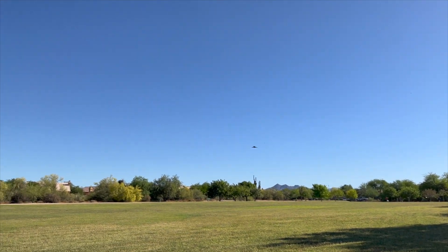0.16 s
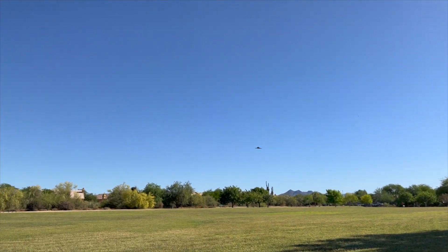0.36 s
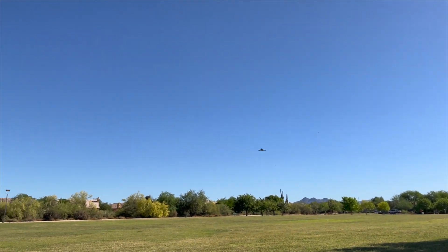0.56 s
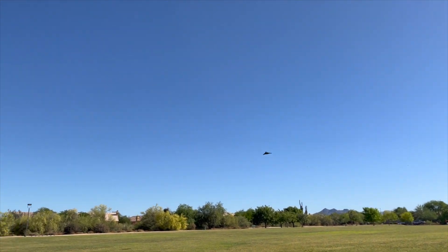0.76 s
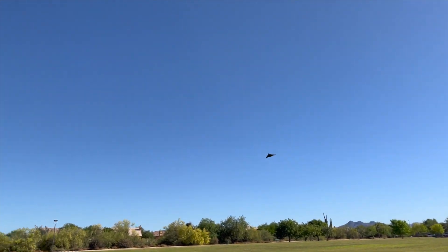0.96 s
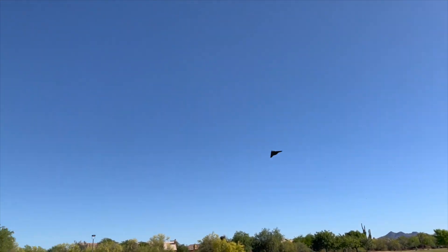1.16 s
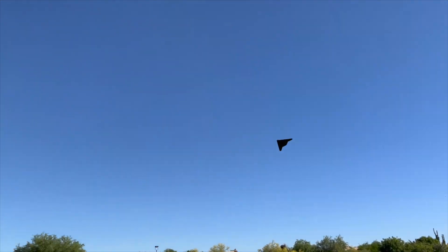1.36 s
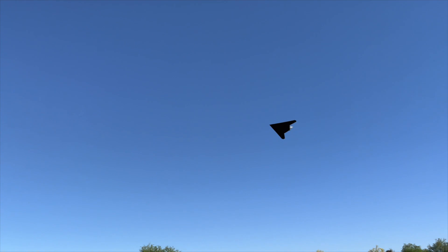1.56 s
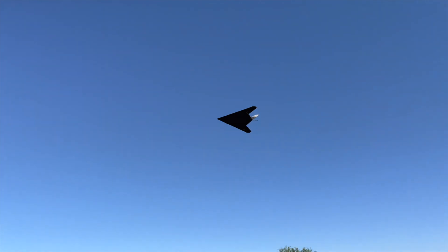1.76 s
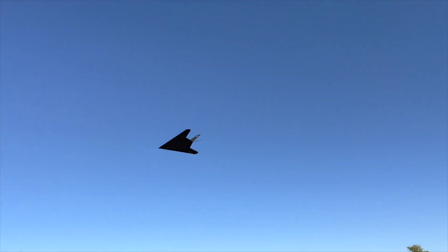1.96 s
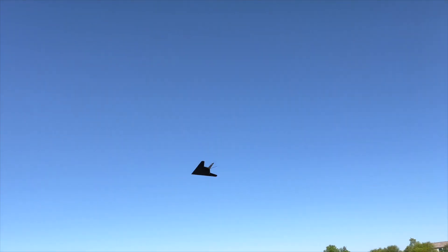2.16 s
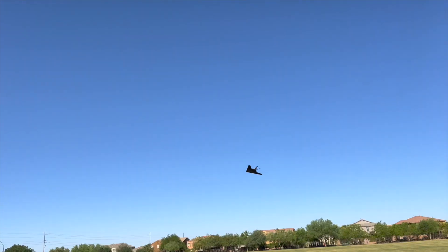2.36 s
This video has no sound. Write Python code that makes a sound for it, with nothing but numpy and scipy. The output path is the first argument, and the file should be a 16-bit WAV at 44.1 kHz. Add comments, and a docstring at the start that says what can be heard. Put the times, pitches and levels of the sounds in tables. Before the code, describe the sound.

Outdoors in a grassy field, heard on a stereo phone: a model jet's thin fan whine and rushing air grow fast, sweep close by, sag in pitch and ease off, over faint low traffic rumble.

```python
"""Over a grass field, a small model jet with an electric ducted fan comes in low, passes a phone and leaves.
Far traffic rumbles underneath: low noise. The efflux roars and hisses: noise in six bands, and the grass
mirrors it as a late, duller copy. Eleven blades sing as a roughened sine in a haze of turbulence, which is
noise moved up to the blade pitch. The shaft whines as sines with overtones; the pitch sags in passing."""
import sys
import numpy as np
from scipy import signal
from scipy.fft import rfft, irfft
from scipy.io import wavfile
from scipy.ndimage import uniform_filter1d, map_coordinates

SR = 44100
rng = np.random.default_rng(int(sys.argv[2]) if len(sys.argv) > 2 else 0)


def dump(signal):
    """Clip the signal to [-1, 1] and save it as 16-bit WAV at the path in sys.argv[1]."""
    limited = np.clip(np.atleast_2d(signal).T, -1, 1)
    pcm = np.round(limited * 32767).astype(np.int16)
    wavfile.write(sys.argv[1], SR, pcm)


N = 106192
T = np.arange(N) / SR  # time of each sample, s
HZ = np.maximum(np.fft.rfftfreq(N, 1 / SR), 1)  # frequency of each bin; at least 1 so its log exists
BLADES = 11

# Pitch of the turning shaft as heard: (time [s], frequency [Hz])
SHAFT_PITCH = [(0.06, 628.6), (0.4, 628.7), (0.8, 628.6), (1.1, 630.7), (1.3, 629.4), (1.45, 627.7),
               (1.55, 620.3), (1.65, 615.6), (1.75, 607.8), (1.85, 594.1), (1.95, 584.7), (2.05, 576.3),
               (2.12, 568.2), (2.2, 562.5), (2.28, 561.8), (2.35, 561), (2.41, 559)]
# The blades' sound, the haze before its trim:
# (time [s], tone level [dB], haze level [dB], left minus right of the tone [dB])
BLADE_LEVELS = [(0.06, -65, -60, 0), (0.4, -61, -56.5, 0), (0.8, -57, -52, 0), (1.1, -53, -47, 0),
                (1.3, -46, -42, 0), (1.45, -52, -42, 0), (1.55, -44, -44, -1), (1.62, -37.5, -45, -3),
                (1.72, -48, -43, 0), (1.78, -44, -44, 0), (1.84, -50, -45, 4), (1.91, -43, -48, 10),
                (2.02, -46, -46, 9), (2.09, -49, -46, 5), (2.18, -36.5, -44, -1), (2.255, -43, -43, -2),
                (2.31, -39, -43, -4), (2.41, -42, -43, -5)]


def undb(db):
    """Turn decibels into a gain."""
    return 10 ** (np.asarray(db) / 20)


def curves(table):
    """Draw each column of a time table as a line with one value per sample."""
    rows = np.array(table, float)
    return [np.interp(T, rows[:, 0], column) for column in rows.T[1:]]


def over_hz(table):
    """Draw each column of a frequency table with one value per bin, straight over log frequency."""
    rows = np.array(table, float)
    return [np.interp(np.log(HZ), np.log(rows[:, 0]), column) for column in rows.T[1:]]


def unit(x):
    """Scale a signal to an rms of 1."""
    return x / np.sqrt(np.mean(x ** 2))


def walk(rate):
    """Wander at random: new values at this rate [Hz], smoothed twice, with mean 0 and spread 1."""
    hold = int(SR / rate)  # samples per value
    steps = np.repeat(rng.standard_normal(N // hold + 1), hold)
    smooth = uniform_filter1d(uniform_filter1d(steps, hold), hold)[:N]
    return unit(smooth - smooth.mean())


def rumble():
    """Far traffic and air: noise kept to the low end, with a restless level."""
    # Colour of the rumble before the two cuts below: (frequency [Hz], level per Hz [dB])
    rumble_colour = [(12, -50), (20, -25), (60, -1.5), (96, -6), (123, -9), (177, -19), (242, -18),
                     (307, -25), (400, -22.5), (520, -6.5), (880, -120)]
    # Loudness of the rumble before its flicker: (time [s], level [dB])
    rumble_level = [(0.0, -48), (0.1, -47), (0.2, -45), (0.3, -46), (0.46, -46.5), (0.53, -43),
                    (0.6, -46.5), (0.7, -47.5), (0.78, -45.5), (0.88, -48.5), (0.95, -45.5), (1.05, -43),
                    (1.24, -47.5), (1.3, -43), (1.4, -49), (1.5, -46.5), (1.72, -49.5), (1.8, -40),
                    (1.9, -36.5), (1.97, -43.5), (2.15, -44.5), (2.41, -44)]
    flicker_db = .6
    spectrum = rfft(rng.standard_normal(N)) * undb(over_hz(rumble_colour)[0])
    spectrum = spectrum / (1 + (HZ / 400) ** 4)  # fades above 400 Hz
    spectrum = spectrum / (1 + (22 / HZ) ** 6)  # and below 22 Hz
    level_db = curves(rumble_level)[0] + flicker_db * walk(8.36)
    return undb(level_db) * unit(irfft(spectrum, N))


def grass_echo(direct):
    """The ground mirrors the roar: a longer path makes it late, and the grass dulls it."""
    # Delay of the path over the grass, before smoothing: (time [s], delay [ms])
    path_delay = [(0, .87), (.35, 1.02), (.7, 1.24), (1.05, 1.56), (1.4, 2.16), (1.7, 3.05), (1.82, 3.33),
                  (1.97, 3.32), (2.2, 2.5), (2.41, 1.82)]
    # Loudness of the mirrored roar, relative to the dulled copy: (time [s], level [dB])
    mirror_level = [(0, -4), (.8, -4.5), (1.2, -8), (1.9, -7), (2.41, -8)]
    grass_hz, grass_lag_rad = 5500, 1.0
    spectrum = rfft(direct) * np.exp(-1j * grass_lag_rad)
    dull = irfft(spectrum / np.sqrt(1 + (HZ / grass_hz) ** 4), N)
    late_s = uniform_filter1d(curves(path_delay)[0], size=3000) / 1000
    # The sliding delay reads between samples
    late = map_coordinates(dull, [(T - late_s) * SR], order=3, mode="mirror")
    return undb(curves(mirror_level)[0]) * late


def roar():
    """Rushing air: noise split into six bands that each swell their own way, plus the grass echo."""
    # Colour of the rushing air before the low cut and band levels: (frequency [Hz], level per Hz [dB])
    air_colour = [(120, -14), (240, -6.5), (350, -2.5), (520, -6), (750, -2), (900, -2.5), (1080, -7),
                  (1250, -1.5), (1600, 0), (1800, -5.5), (2100, -8), (2450, -5), (2900, -8), (3500, -11),
                  (3800, -12), (4100, -16.5), (4400, -19.5), (4750, -23), (5150, -15.5), (5800, -14),
                  (6300, -14), (7000, -15.5), (7600, -17), (8800, -21), (10000, -24), (11200, -26),
                  (13000, -26.5), (16000, -28)]
    # Borders between the six bands: (frequency [Hz])
    band_borders = [1050, 1900, 3150, 4400, 8500]
    # Loudness of the lowest band before gusts: (time [s], level [dB])
    low_level = [(0, -57), (.3, -54), (.6, -53), (.9, -50), (1.2, -47.5), (1.45, -44), (1.65, -39.5),
                 (1.8, -36), (1.95, -38), (2.1, -41), (2.25, -43), (2.41, -45)]
    # Loudness of the other five bands before gusts: (time [s], middle roar level [dB],
    # upper roar level [dB], thin roar level [dB], hiss level [dB], top hiss level [dB])
    upper_levels = [(0, -50, -56.5, -66.5, -56.5, -76), (.3, -51.5, -56, -72, -52, -69),
                    (.6, -49.5, -59, -59, -53, -69.5), (.9, -47, -53.5, -56.5, -50, -58),
                    (1.2, -43, -49.5, -52, -47.5, -53.5), (1.45, -38.5, -49.5, -49.5, -44.5, -46.5),
                    (1.65, -38, -44.5, -58, -43.5, -49), (1.8, -35.5, -40, -54, -41.5, -50),
                    (1.95, -31.5, -43.5, -66, -40.5, -53.5), (2.1, -33, -43, -52.5, -42.5, -45.5),
                    (2.25, -39, -43.5, -43.5, -44, -46.5), (2.41, -39.5, -49.5, -46, -40.5, -45)]
    gust_db = 1.1
    air = rfft(rng.standard_normal(N)) * undb(over_hz(air_colour)[0])
    air = air / np.sqrt(1 + (100 / HZ) ** 6)  # fades below 100 Hz
    # Each band is what one low-pass lets through beyond the one before it
    lows = [0] + [1 / (1 + (HZ / border) ** 6) for border in band_borders] + [1]
    direct = np.zeros(N)
    for k, level_db in enumerate(curves(low_level) + curves(upper_levels)):
        band = unit(irfft(air * (lows[k + 1] - lows[k]), N))
        direct += undb(level_db + gust_db * walk(8.75)) * band
    return direct + grass_echo(direct)


def haze():
    """Turbulence cut by the blades: slow noise carried on the blade pitch becomes a band around it."""
    width_hz, trim_db = 240, -1

    def slow_noise():
        """Noise that fades above the haze width."""
        return irfft(rfft(rng.standard_normal(N)) / (1 + (HZ / width_hz) ** 2), N)

    blade_turn = 2 * np.pi * BLADES * np.cumsum(curves(SHAFT_PITCH)[0]) / SR
    band = slow_noise() * np.sin(blade_turn) + slow_noise() * np.cos(blade_turn)
    return undb(curves(BLADE_LEVELS)[1] + trim_db) * unit(band)


def shaft_turn():
    """Angle of the shaft as heard [rad]: the smoothed pitch added up over time, with a slight jitter."""
    jitter = 0.00033  # share of the pitch
    pitch_hz = uniform_filter1d(curves(SHAFT_PITCH)[0], size=2000) * (1 + jitter * walk(29.73))
    return 2 * np.pi * np.cumsum(pitch_hz) / SR


def blade_tone(turn):
    """The blades sing at eleven times the shaft pitch, roughened by the wakes they cut."""
    rough_hz, roughness = 40, .35
    # The complex wander shakes both loudness and phase
    wakes = 1 + roughness * (walk(rough_hz) + 1j * walk(rough_hz))
    tone = np.imag(wakes * np.exp(1j * BLADES * turn))
    return np.sqrt(2) * undb(curves(BLADE_LEVELS)[0]) * tone


def whine(turn):
    """The shaft tone and its 2nd, 3rd and 5th multiples are sines whose levels flutter in the air."""
    # Loudness of the shaft tone before flutter: (time [s], level [dB])
    tone_level = [(0.03, -41), (0.44, -39), (0.99, -33), (1.23, -32.5), (1.36, -37.5), (1.44, -35),
                  (1.59, -23), (1.78, -17), (1.94, -16), (2.02, -18.5), (2.09, -25.5), (2.16, -38),
                  (2.2, -34), (2.24, -43.5), (2.3, -32.5), (2.39, -34.5)]
    # Loudness of the overtones before flutter: (time [s], 2nd multiple level [dB], 3rd multiple level [dB])
    overtone_levels = [(0, -53, -51.5), (.45, -59, -58), (.65, -50.5, -71), (.9, -50.5, -47),
                       (1.1, -44, -46.5), (1.2, -50.5, -56), (1.33, -43, -42), (1.55, -40, -46),
                       (1.7, -39, -40.5), (1.8, -31.5, -51), (1.93, -34.5, -37), (2.05, -42, -43),
                       (2.2, -44, -50), (2.33, -62, -48), (2.41, -52, -41)]
    tone_flutter_db, overtone_flutter_db = 1.0, 1.5
    fifth_db = -13.5  # 5th multiple relative to the 3rd
    first = curves(tone_level)[0]
    second, third = curves(overtone_levels)
    out = undb(first + tone_flutter_db * walk(24.85)) * np.sin(turn)
    for multiple, level_db in ((2, second), (3, third), (5, third + fifth_db)):
        gain = undb(level_db + overtone_flutter_db * walk(20))
        out = out + gain * np.sin(multiple * turn + 2 * np.pi * rng.random())
    return np.sqrt(2) * out  # a sine's rms is 1 / sqrt(2) of its peak


def scene():
    """The phone's two ports hear one field with their own level and phase, plus noise that differs."""
    # How the two ports differ:
    # (frequency [Hz], left minus right [dB], share of the noise that differs [0-1])
    ports = [(60, 0, .2), (200, -.5, .15), (300, -1.5, .04), (630, -3, .1), (950, -3, .1), (1300, -1, .12),
             (1550, 2, .25), (2150, -1, .08), (2750, -2.5, .04), (3350, 3, .1), (4000, 0, .3),
             (4600, -1, .8), (5150, 2, .45), (5550, 1, .7), (5850, 0, .55), (6300, -1, .2),
             (6900, -2.5, .15), (7600, -1, .3), (8350, 0, .05), (10300, 0, .03), (11500, 0, .02),
             (13800, 0, .03), (14600, 0, .4), (15300, 0, .03)]
    # Phase by which the left port leads: (frequency [Hz], lead [rad])
    left_lead = [(60, 0), (900, -.25), (1700, -.3), (2800, .1), (3700, -.7), (4300, -1), (4900, 1.8),
                 (5500, 2.5), (5850, 3.8), (6200, 4.1), (6500, 3.2), (6900, 2.6), (8350, .1), (10300, -.1),
                 (11500, -3.1), (13800, -3.2), (15100, -6.2)]
    # Balance of the whole sound over time: (time [s], left minus right [dB])
    balance = [(0, -0.5), (1.2, -0.5), (1.8, -0.5), (2.41, 0)]
    port_db, share = over_hz(ports)
    lead = over_hz(left_lead)[0]
    pan_db, blade_pan_db = curves(balance)[0], curves(BLADE_LEVELS)[2]
    turn = shaft_turn()
    blades = blade_tone(turn)
    common = rfft(roar() + haze() + rumble()) * np.sqrt(1 - share / 2) + rfft(whine(turn))
    # A second, independent noise goes to the two ports with opposite signs
    apart = rfft(roar() + haze() + rumble()) * np.sqrt(share / 2)
    sides = []
    for side in (1, -1):  # left, right; each takes half of every difference
        panned_blades = rfft(undb(side * blade_pan_db / 2) * blades)
        heard = common + side * apart + panned_blades
        heard = heard * np.exp(1j * side * lead / 2) * undb(side * port_db / 2)
        sides.append(undb(side * pan_db / 2) * irfft(heard, N))
    return np.array(sides)


def record(dry):
    """The phone cuts the top: a steep low-pass removes what lies above its limit."""
    top_hz = 15700
    return signal.sosfilt(signal.ellip(14, .2, 80, top_hz, fs=SR, output="sos"), dry)


dry = scene()
out = record(dry)
dump(out)
```